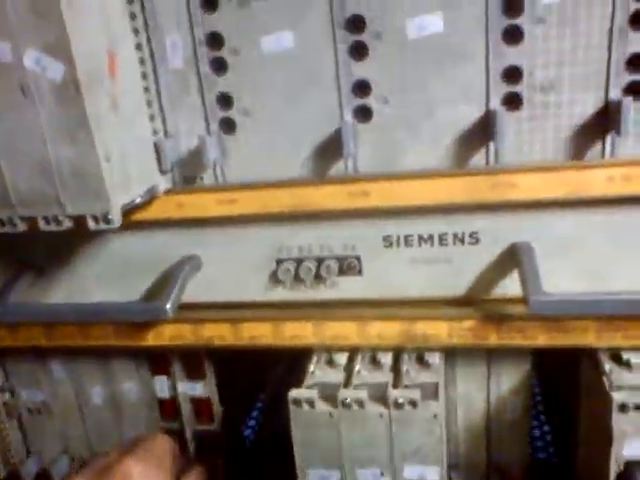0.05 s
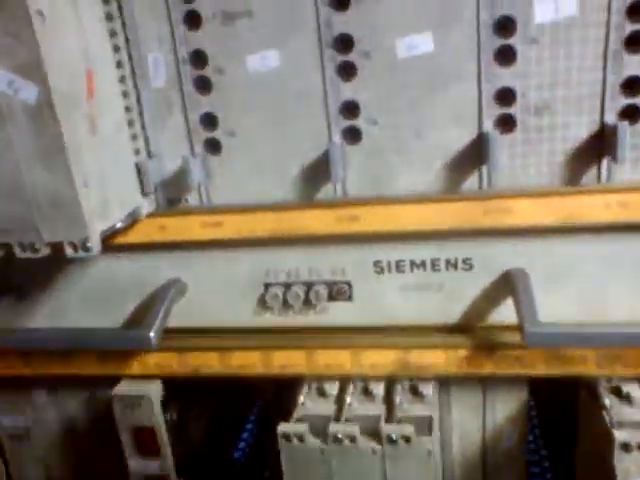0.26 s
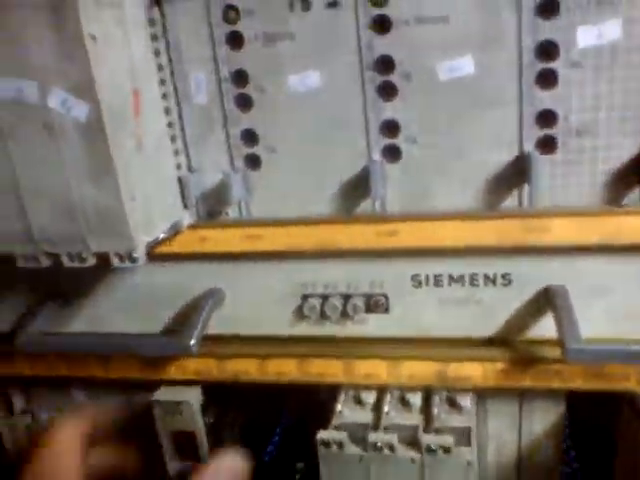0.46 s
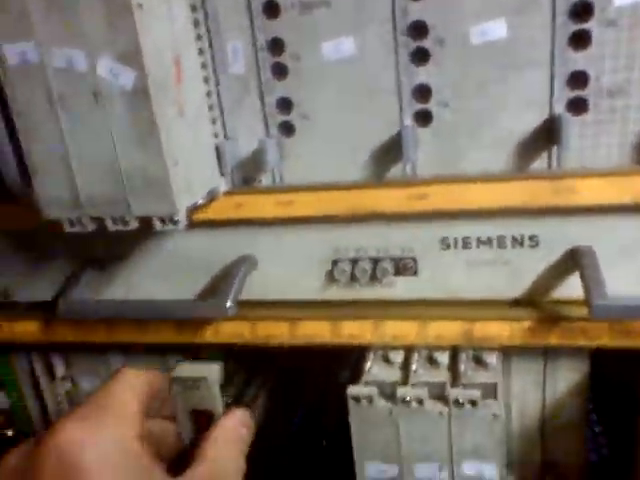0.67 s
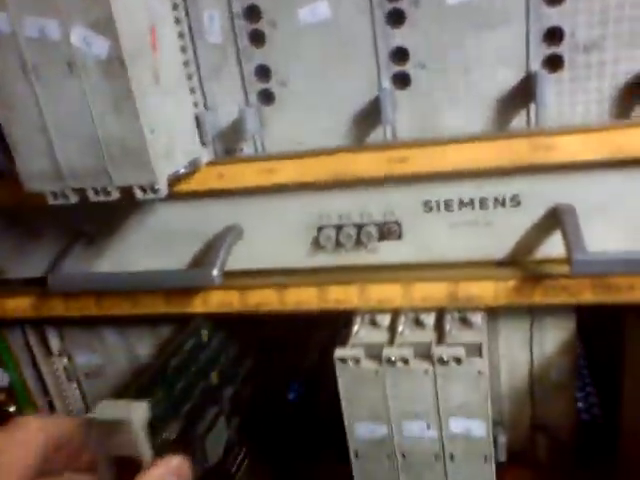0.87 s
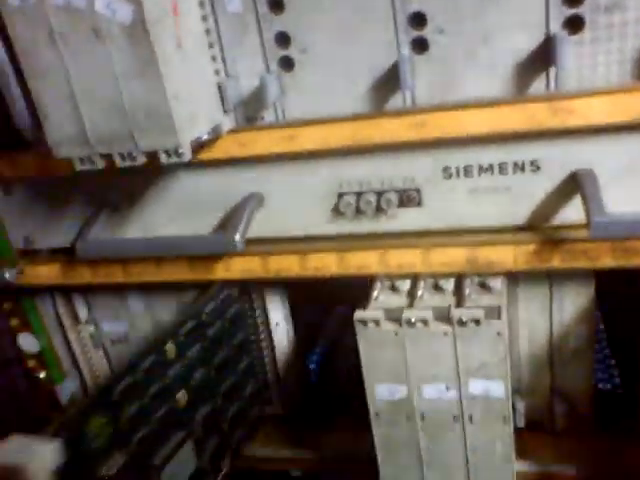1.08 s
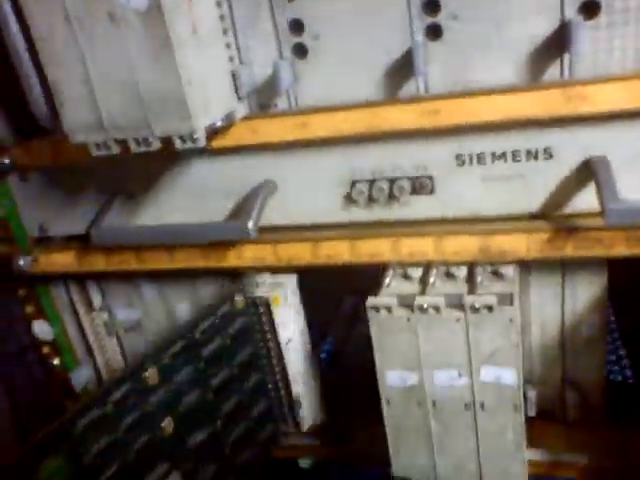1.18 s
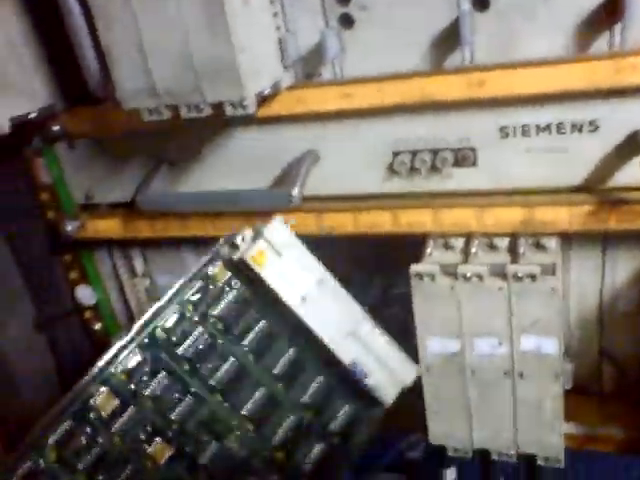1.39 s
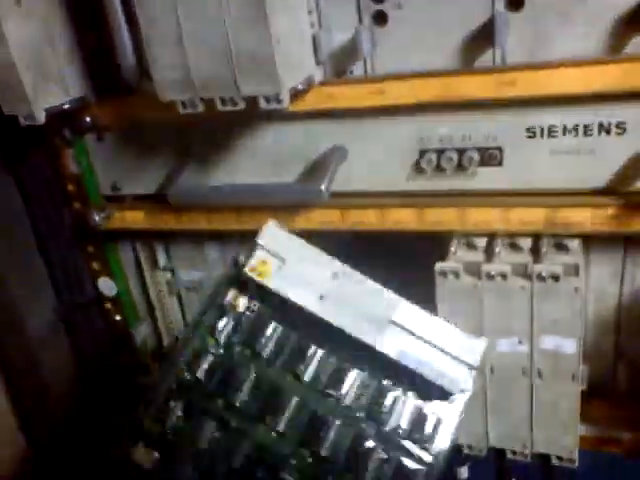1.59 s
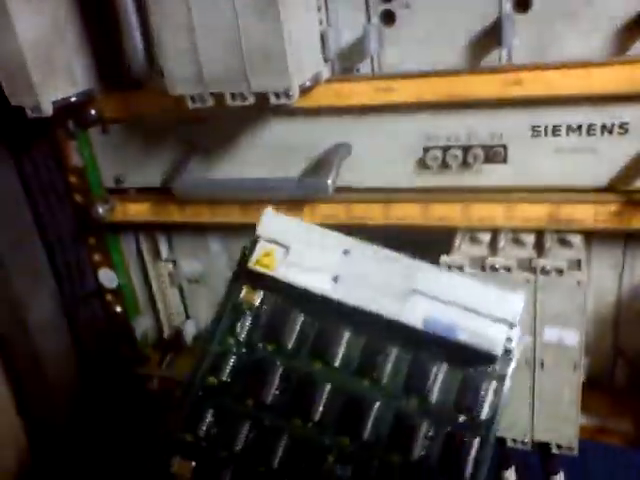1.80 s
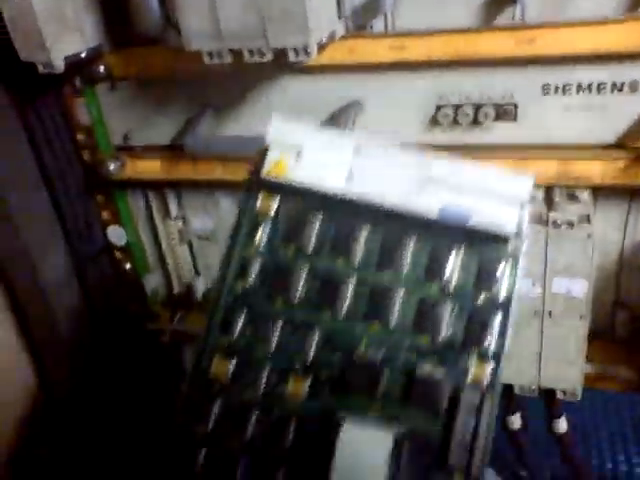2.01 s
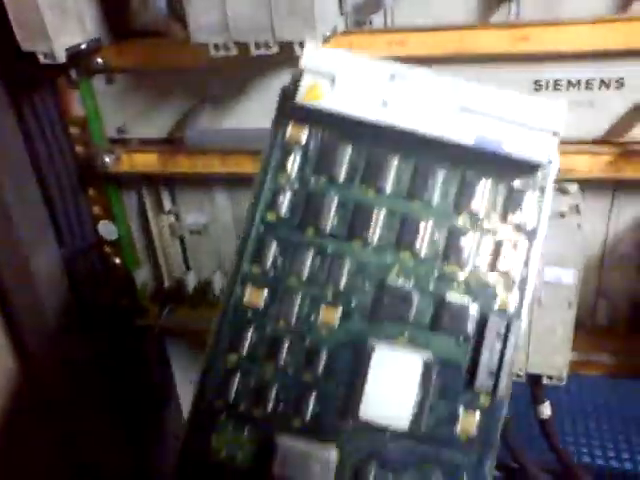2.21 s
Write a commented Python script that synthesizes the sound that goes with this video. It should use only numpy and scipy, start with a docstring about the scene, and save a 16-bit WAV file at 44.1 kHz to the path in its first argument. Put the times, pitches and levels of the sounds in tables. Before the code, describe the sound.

A circuit card is pulled from a steel rack: low fan hum alone, then at 0.2 seconds a loud, crunchy tearing clatter until about 0.45, with small clacks to 0.52. From 0.7 it scrapes and knocks along rails, with a hollow thud near 0.8 and stronger rattling clacks from 1.0 to 1.3. Faint hand rustle fades, leaving hum until 2. Close, boxy, narrow-band, clipped microphone.

```python
"""Circuit card pulled from a steel rack

Close by a steel rack, a circuit card is yanked free of its connector, then slides and knocks along its rails.
Every contact rings modes of card, rails and hollow frame; scrapes and a faint hand rustle are shaped noise.
Cabinet fans hum behind: patchy air noise and wavering shaft tones.
A narrow-band camera microphone ducks its gain after loud sounds and clips the peaks."""
import sys
import numpy as np
from scipy import signal
from scipy.fft import rfft, irfft, next_fast_len
from scipy.io import wavfile
from scipy.ndimage import uniform_filter1d, map_coordinates

SR = 44100
rng = np.random.default_rng(int(sys.argv[2]) if len(sys.argv) > 2 else 0)


def ratio_of_db(decibels):
    """Turn decibels (scalar or array-like) into linear amplitude factors; 0 dB maps to 1."""
    return 10 ** (np.asarray(decibels, float) / 20)


def log_audio(samples):
    """Write samples as a 16-bit WAV file to the path given in sys.argv[1]."""
    # one column per channel
    frames = np.atleast_2d(samples).T
    # limit to full scale, then quantise
    limited = np.clip(frames, -1, 1)
    pcm = np.round(limited * 32767).astype(np.int16)
    wavfile.write(sys.argv[1], SR, pcm)


N = 99225  # samples, 2.25 s


def unit(x):
    """Scaled to rms 1."""
    return x / np.sqrt(np.mean(x ** 2) + 1e-20)


def wobble(knots_per_s):
    """A smooth random curve through normally distributed knots."""
    position = np.arange(N) * np.clip(knots_per_s, 1, 150) / SR
    return map_coordinates(rng.standard_normal(400), [position])


def filtered(x, response):
    """x with its spectrum multiplied by a response of frequency in Hz."""
    m = next_fast_len(N + SR // 2)
    hz = np.fft.rfftfreq(m, 1 / SR)
    return irfft(rfft(x, m) * response(hz), m)[:N]


def add(out, start_s, sounds):
    """Sounds laid into out at their start times."""
    for at, sound in zip(np.round(start_s * SR).astype(int), sounds):
        out[at:at + len(sound)] += sound
    return out


def level_curve(when, level_db):
    """Level in dB at every sample, straight between the points and -120 dB outside them."""
    return np.interp(np.arange(N) / SR, when, level_db, -120, -120)


def ring(modes, gains):
    """One sum of decaying sines for each blow, from its gain on each mode (blows x modes)."""
    t = np.arange(SR // 10) / SR
    hz, db, t60 = np.transpose(modes)[:, :, None]
    decay = ratio_of_db(db - 60 * t / np.clip(t60, .005, .15))
    return gains @ (decay * np.sin(2 * np.pi * hz * t))


# Resonances of card and rails: pitch_hz [Hz], level_db [dB], t60_s [s]
RAIL_MODES = [(1340, -10, .04), (1680, -3, .045), (1810, 0, .055), (1945, -1, .05), (2060, -1, .045),
              (2270, -2, .04), (2410, -1, .05), (2610, -3, .04), (2830, -2, .05), (2960, -2, .06),
              (3150, -5, .04), (3310, -4, .06), (3480, -6, .05), (3700, -12, .03)]
# Resonances of the hollow frame: pitch_hz [Hz], level_db [dB], t60_s [s]
FRAME_MODES = [(371, -6.5, 0.1), (513, 1, 0.033), (754, 8.5, 0.012), (908, 1, 0.028), (1130, 5.5, 0.0068)]
FAVOUR_OCT, MODE_SCATTER_DB = .22, 4
CRACK_DB, CRACK_T60_S = 4.5, 0.0065


def contacts(level_db, pitch_hz, thud_db):
    """Each contact rings the modes near its pitch, thuds the frame and adds a short noise crack."""
    modes = RAIL_MODES + FRAME_MODES
    z = rng.standard_normal((len(level_db), 2, len(modes)))
    share = np.sign(z[:, 0]) * ratio_of_db(MODE_SCATTER_DB * z[:, 1])
    away = np.log2(np.array(modes)[:, 0] / pitch_hz[:, None]) / FAVOUR_OCT
    gains = share / (1 + away ** 2)
    gains = gains / np.linalg.norm(gains, axis=1, keepdims=True)
    frame = slice(len(RAIL_MODES), None)
    gains[:, frame] += share[:, frame] * ratio_of_db(thud_db) / 2
    sound = ring(modes, gains)
    t = np.arange(SR // 50) / SR
    noise = rng.standard_normal((len(level_db), len(t)))
    crack = signal.lfilter([1, -.9], [1, -.6], noise, axis=1)
    sound[:, :len(t)] += ratio_of_db(CRACK_DB - 60 * t / CRACK_T60_S) * crack
    return sound * ratio_of_db(level_db)[:, None]


RATTLE_SPREAD_OCT, RATTLE_SCATTER_DB = .18, 3.5


def drag(stroke, rattles_per_s, thud_db, scrape_db):
    """Dense random contacts and a noise scrape that follow a stroke; the contacts also follow its pitch."""
    when, level_db, pitch_hz = np.transpose(stroke)
    z = rng.random((500, 3))
    gaps_s = -np.log(z[:, 0] + 1e-9) / rattles_per_s
    start_s = when[0] + np.cumsum(gaps_s)
    scatter_db = RATTLE_SCATTER_DB * (1 + np.log(z[:, 1] + .05))
    size_db = np.interp(start_s, when, level_db, -120, -120) - scatter_db
    pitch = np.interp(start_s, when, pitch_hz) * 2 ** (RATTLE_SPREAD_OCT * (2 * z[:, 2] - 1))
    blows = contacts(size_db, pitch, thud_db)
    rattle = add(np.zeros(N + SR), np.minimum(start_s, N / SR), blows)[:N]
    # broad noise band around 2300 Hz
    scrape = unit(filtered(rng.standard_normal(N), lambda f: (f / 2300) ** 2 / (1 + (f / 2300) ** 4)))
    return rattle + ratio_of_db(level_curve(when, level_db) + scrape_db) * scrape


# The card tearing out of its connector: start_s [s], level_db [dB], pitch_hz (favoured) [Hz]
YANK_STROKE = [(.211, -38.5, 1760), (.214, -12, 1780), (.228, -7.5, 1850), (.24, 0, 1930),
               (.265, -1.5, 1730), (.276, 2.5, 2180), (.286, 3.5, 2830), (.3, 6, 2370), (.315, 1, 2010),
               (.328, 2, 2020), (.331, -6, 2140), (.35, 0, 2750), (.362, -1.5, 3326), (.39, -8.5, 3370),
               (.42, -17, 2950), (.45, -21, 2210), (.47, -35, 2330)]


def yank():
    """The connector lets go: very dense contacts with a strong scrape."""
    return drag(YANK_STROKE, rattles_per_s=1100, thud_db=-18.5, scrape_db=-7)


SLIDE_THUD_DB = -26  # frame thud before contacts() halves it
# Dragging along the rails: start_s [s], level_db [dB], pitch_hz (favoured) [Hz]
SLIDE_STROKE = [(.72, -28.5, 1890), (.775, -22.5, 1885), (.83, -20, 2010), (.87, -26, 2420),
                (.9, -25.5, 2000), (.94, -20.5, 1940), (.98, -22.5, 2040), (1.04, -14, 2440),
                (1.08, -30, 2230), (1.11, -29.5, 2240), (1.178, -55, 2350), (1.186, -15.5, 2360),
                (1.26, -12, 2320), (1.295, -15, 2960), (1.33, -17.5, 2330), (1.345, -50, 2310)]


def slide():
    """The card rubs along its guide rails: sparser contacts with a weaker scrape."""
    return drag(SLIDE_STROKE, rattles_per_s=450, thud_db=SLIDE_THUD_DB, scrape_db=-11)


MIC_TOP_HZ, MIC_FALL_DB_PER_KHZ = 3406, 31.5
CHATTER_FADE_DB, FIRST_BLOW_DB = 3, 5
GRIP_DB_PER_S = 450  # the hand damps the card after a knock
# Distinct knocks; low pitches are hollow thuds of the frame:
# start_s [s], level_db (peak below the microphone's top) [dB], pitch_hz (favoured) [Hz], chatter_s [s]
KNOCKS = [(.2108, -1.5, 1770, 0.0044), (.234, 6.5, 2960, 0.017), (.337, -3, 2320, 0.0045),
          (.349, 6, 2833, 0.0039), (.358, 5, 2960, 0.0035), (.388, 3.5, 2210, .002),
          (.470, -8, 3380, 0.0028), (.4735, -0.5, 2000, .003), (.481, -16, 1980, 0.0032),
          (.484, -9, 1340, 0.0052), (.5205, -6, 1945, 0.0018), (.523, -9.5, 3400, 0.0048),
          (.6807, -3, 2100, 0.0043), (.7376, -3.5, 2287, 0.0034), (.8022, -4.5, 1654, 0.014),
          (.804, -6.5, 910, 0.011), (.873, -14.5, 2410, .004), (.877, -5.5, 2444, 0.0041),
          (.886, -8, 1883, 0.0048), (.917, -13, 2210, 0.005), (.9405, -3, 2080, 0.0053),
          (0.9395, -9.5, 756, 0.0046), (.950, -4.5, 1974, 0.0027), (.962, -9, 371, .03),
          (1.0115, 1.5, 2036, .004), (1.018, -3.5, 2196, .008), (1.033, -1, 2870, 0.013),
          (1.049, -3.5, 2160, 0.0039), (1.130, -10.5, 2340, .004), (1.141, -13, 2556, .003),
          (1.181, -6, 2150, .012), (1.2108, -0.67, 2108, .015), (1.236, -0.6, 1950, 0.012),
          (1.251, 4, 2440, 0.0025), (1.2565, 2.5, 2050, 0.0032), (1.264, -1.5, 2370, 0.0043),
          (1.279, -2.5, 3060, 0.016), (1.306, -5.5, 2250, 0.0054)]


def clacks():
    """The distinct knocks: each a strong first blow and a short chatter of ever weaker contacts."""
    out = np.zeros(N + SR)
    lowpass = signal.butter(4, 2 * MIC_TOP_HZ / SR)
    for start_s, level_db, pitch_hz, chatter_s in KNOCKS:
        place = np.append(0, (np.arange(1, 5) + rng.random(4)) / 5)  # 0 to 1 through the chatter
        blow_db = FIRST_BLOW_DB * (place == 0) - CHATTER_FADE_DB * place
        blows = contacts(blow_db, pitch_hz + 0 * place, SLIDE_THUD_DB)
        knock = add(np.zeros(SR // 7), place * abs(chatter_s), blows)
        knock = knock * ratio_of_db(-GRIP_DB_PER_S * np.arange(len(knock)) / SR)
        peak = np.abs(signal.lfilter(*lowpass, knock)).max()
        add(out, np.array([start_s]), [ratio_of_db(level_db) * knock / peak])
    return out[:N]


# Hand shifting on the card: start_s [s], level_db [dB]
HAND_RUSTLE = [(0.399, -29), (.47, -32), (.66, -32.5), (1.359, -32), (1.48, -53), (1.602, -55)]


def rustle():
    """A faint broad noise, its level wavering, while the hand holds the card."""
    when, level_db = np.transpose(HAND_RUSTLE)
    noise = unit(filtered(rng.standard_normal(N), lambda f: (f / 700) ** 2 / (1 + (f / 700) ** 2.95)))
    return ratio_of_db(level_curve(when, level_db) + 5.1 * wobble(31.69)) * noise


ROOM_DB, ROOM_T60_S = -9, .13


def room(x):
    """The short answer of the steel cabinet: decaying noise, drawn afresh every 40 ms so no one draw colours it."""
    t = np.arange(SR // 5) / SR
    step = SR // 25
    out = np.zeros(N + SR)
    for at in range(0, N, step):
        tail = rng.standard_normal(len(t)) * ratio_of_db(-60 * t / ROOM_T60_S) * (t > .003)
        part = signal.fftconvolve(x[at:at + step], tail / np.linalg.norm(tail))
        out[at:at + len(part)] += part
    return ratio_of_db(ROOM_DB) * out[:N]


AIR_DB, PATCH_DB = -27, 1.5  # rms level; spread of the patches over time and frequency
FAN_HZ = 41.66  # shaft turns per second
FAN_WAVER_DB, FAN_WAVERS_PER_S = 3.5, 14
# Spectrum of the fan air noise: pitch_hz [Hz], level_db (relative) [dB per Hz]
AIR_SPECTRUM = [(15, -47.5), (25, -31), (123, -7), (171, -3.5), (222, -11), (294, -3.5), (417, -7.5),
                (592, -10), (689, -16), (999, -14.5), (3110, -26), (3860, -41.5), (4600, -68.5),
                (5980, -103)]
# Shaft tones: multiple (of FAN_HZ) [count], level_db (rms before wavering) [dB]
SHAFT_TONES = [(3, -40.5), (4, -39.5), (6, -41.5), (7, -35), (11, -39.5)]


def fans():
    """Patchy air noise, with shaft tones wavering in level and phase."""
    z = signal.stft(rng.standard_normal(N), nperseg=1024)[2]
    patches = uniform_filter1d(rng.standard_normal(z.shape), 5, 0)
    patches = uniform_filter1d(patches, 6, 1)
    noise = signal.istft(z * ratio_of_db(PATCH_DB * unit(patches)), nperseg=1024)[1][:N]
    f, db = np.transpose(AIR_SPECTRUM)
    air = unit(filtered(noise, lambda hz: ratio_of_db(np.interp(np.log(hz + 1), np.log(f + 1), db))))
    out = ratio_of_db(AIR_DB) * air
    turns = FAN_HZ * np.arange(N) / SR
    for multiple, level_db in SHAFT_TONES:
        loudness = np.sqrt(2) * ratio_of_db(level_db + FAN_WAVER_DB * wobble(FAN_WAVERS_PER_S))
        phase = 2 * np.pi * (multiple * turns + rng.random()) + 0.76 * wobble(9.2)
        out = out + loudness * np.sin(phase)
    return out


def scene():
    """Card and cabinet through the microphone's treble fall, plus fans whose spectrum already falls."""
    card = yank() + slide() + clacks() + rustle()
    card = card + room(card)
    card = filtered(card, lambda hz: ratio_of_db(-MIC_FALL_DB_PER_KHZ * np.clip(hz - MIC_TOP_HZ, 0, None) / 1000))
    return (card + fans())[None]


def low_pass(x):
    """Removes everything above the highest recorded frequency."""
    return signal.sosfilt(signal.butter(12, 16480, fs=SR, output="sos"), x)


LOW_CUT_HZ = 39
DUCK_ABOVE_DB, DUCK_SHARE = -19, 0.5  # threshold; part of the excess dB taken away
DUCK_WINDOW_S, DUCK_ATTACK_S, DUCK_RELEASE_DB_PER_S = 0.0079, 0.038, 21.5
CLIP_TOP, CLIP_HARD = .72, 50  # ceiling; exponent of the bend into it


def record(dry):
    """Narrow-band microphone: band limit, gain that ducks quickly and returns slowly, clipped peaks."""
    x = filtered(dry[0], lambda hz: np.clip((4900 - hz) / 500, 0, 1) ** 2 * hz ** 2 / (hz ** 2 + LOW_CUT_HZ ** 2))
    power = np.abs(uniform_filter1d(x ** 2, max(int(DUCK_WINDOW_S * SR), 1)))
    over_db = DUCK_SHARE * np.clip(10 * np.log10(power + 1e-12) - DUCK_ABOVE_DB, 0, None)
    # hold the deepest duck, releasing at a steady rate
    ramp = DUCK_RELEASE_DB_PER_S * np.arange(N) / SR
    held_db = np.maximum.accumulate(over_db + ramp) - ramp
    keep = np.exp(-1 / (DUCK_ATTACK_S * SR))
    duck_db = signal.lfilter([1 - keep], [1, -keep], held_db)
    x = x * ratio_of_db(-duck_db)
    x = x / (1 + np.abs(x / CLIP_TOP) ** CLIP_HARD) ** (1 / CLIP_HARD)
    return low_pass(x[None])


dry = scene()
out = record(dry)
log_audio(out)
```